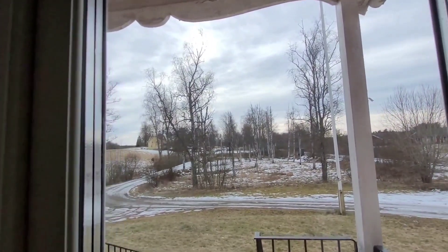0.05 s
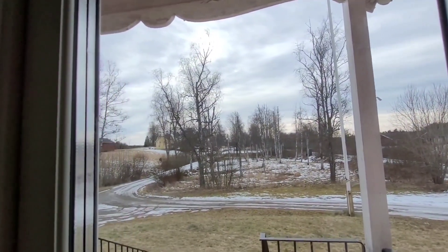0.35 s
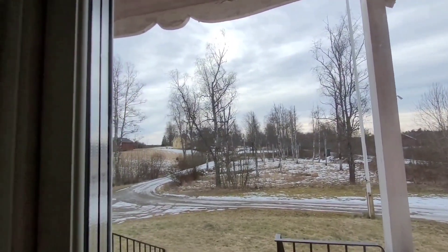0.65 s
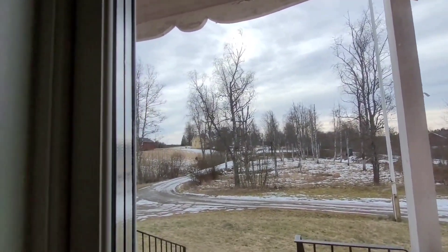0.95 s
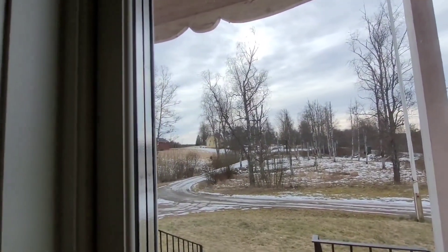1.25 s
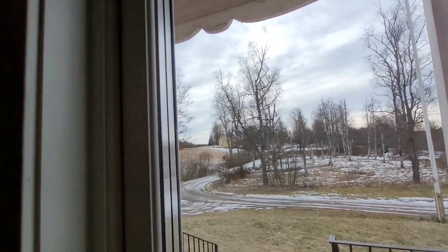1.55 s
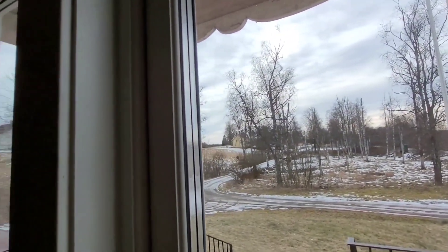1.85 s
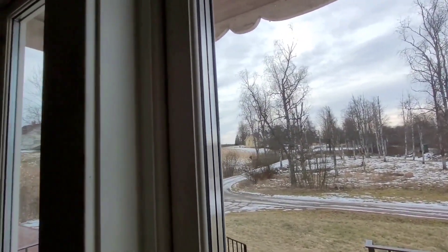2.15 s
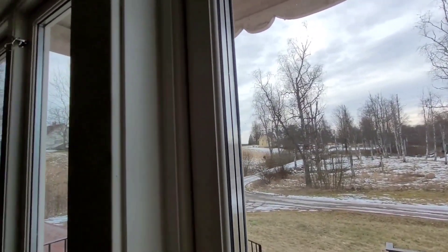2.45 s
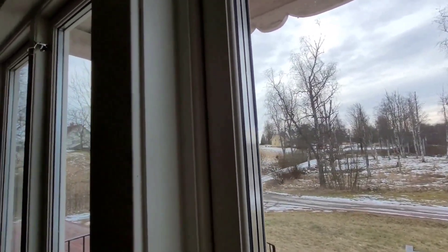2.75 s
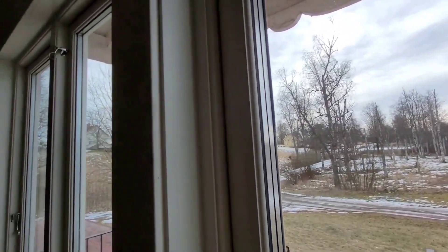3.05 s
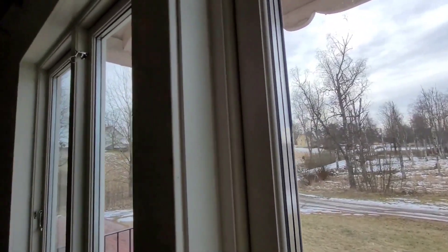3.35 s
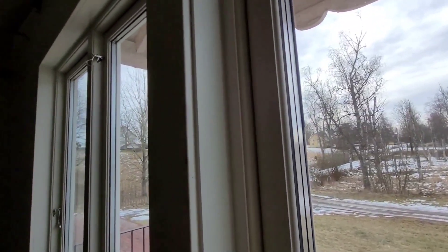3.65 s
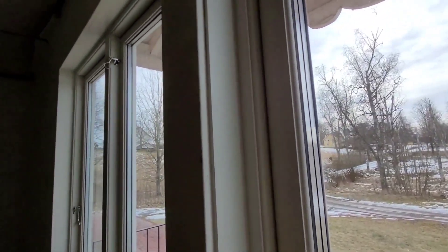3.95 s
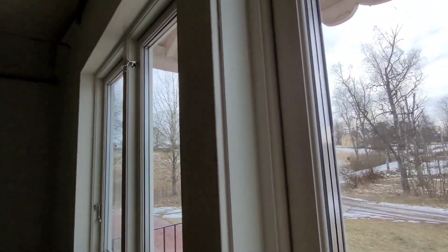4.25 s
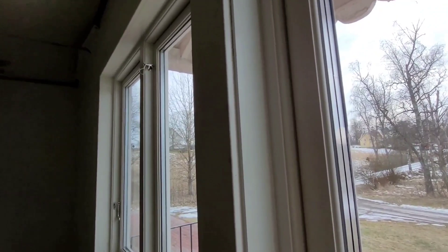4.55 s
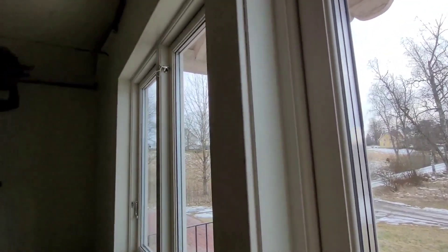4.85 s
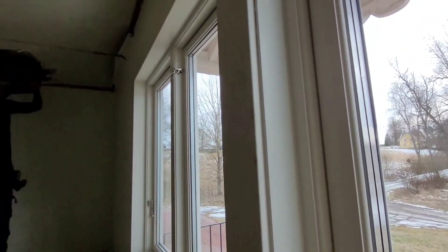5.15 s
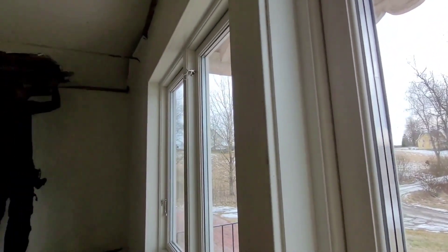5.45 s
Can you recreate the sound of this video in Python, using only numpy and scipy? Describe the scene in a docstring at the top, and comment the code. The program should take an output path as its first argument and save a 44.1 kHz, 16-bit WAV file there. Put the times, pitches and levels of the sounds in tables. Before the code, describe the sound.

Irregular wooden thuds and knocks sound as someone levers boards off a ceiling, with short creaks, squeaking nails and gritty scrapes between them. The loudest moment comes near the end, when thin wood splinters in several sharp cracks and a board falls. A drag, one more snap and small bumps follow. It is heard from a phone some distance away in an empty, reverberant room with almost no background noise.

```python
"""A hollow wooden thud opens the scene: ceiling boards are being pried down in a bare, echoing room.
Each blow flexes the board, knocks on wood, snaps splinters, booms in the joists and rebounds once.
Scraps are dragged over rubble in short strokes, levered nails squeak and boards creak, then laths
snap and one board crashes down. A phone across the room picks it up and hushes whatever is faint."""
import sys
import numpy as np
from scipy import signal
from scipy.fft import rfft, irfft, next_fast_len
from scipy.io import wavfile
from scipy.ndimage import uniform_filter1d

SR = 44100
rng = np.random.default_rng(int(sys.argv[2]) if len(sys.argv) > 2 else 0)


def inscribe(sig):
    """Save sig as 16-bit PCM at rate SR to the path in sys.argv[1].

    A 1-D sig is mono; a 2-D sig holds one channel per row.
    Samples are clipped to [-1, 1] before scaling.
    """
    pcm = np.round(np.clip(np.atleast_2d(sig).T, -1, 1) * 32767)
    wavfile.write(sys.argv[1], SR, pcm.astype(np.int16))


N = 246959
T, HZ = np.arange(SR) / SR, np.fft.rfftfreq(SR, 1 / SR)  # time and frequency axes of a one-second hit


def amp(db):
    """Decibels to gain."""
    return 10 ** (np.asarray(db) / 20)


def unit(x):
    """Scale to rms 1."""
    return x / np.sqrt(np.mean(x ** 2) + 1e-30)


def along(points, hz):
    """Read (frequency, value) points on a log frequency axis."""
    f, v = np.transpose(points)
    return np.interp(np.log(hz + 1), np.log(f + 1), v)


def causal(gain):
    """The minimum-phase response with this gain: nothing sounds before the hit."""
    cepstrum = irfft(np.log(np.maximum(gain, 1e-6)))
    half = len(cepstrum) // 2
    cepstrum[1:half] *= 2
    cepstrum[half + 1:] = 0
    return np.exp(rfft(cepstrum))


def resonances(modes):
    """Response of a body with these modes, falling steeply away from them."""
    return causal(sum(amp(db) / (1 + ((HZ ** 2 - centre ** 2) / (2 * width * (HZ + 1))) ** 2)
                      for centre, width, db in modes))


def softened(hz, edge_hz):
    """Low-pass: a soft contact holds little above its edge."""
    s = 1j * hz / edge_hz
    return 1 / (1 + np.sqrt(2) * s + s * s)


# Reverb of the bare room: (frequency [Hz], t60 [s])
ROOM_DECAY = [(60, 0.41), (150, 0.42), (300, 0.64), (700, 0.79), (1300, 0.81), (2000, 0.74), (4000, 0.48),
              (7000, 0.39), (10000, 0.33), (15000, 0.4)]
def room_response(direct, echoes_per_s, build_s):
    """The direct click, separate wall echoes, then a dense tail that lingers longest in the mids."""
    density = np.clip(echoes_per_s / SR * (1 + T / build_s) ** 2, 1e-4, 1)
    echoes = rng.standard_normal(SR) * (rng.random(SR) < density) / np.sqrt(density)
    hz, times, spectra = signal.stft(echoes, SR, nperseg=256, noverlap=128)
    decay = 1000. ** (-times / along(ROOM_DECAY, hz)[:, None])
    tail = signal.istft(spectra * decay, SR, nperseg=256)[1][:SR]
    tail /= np.linalg.norm(tail)
    tail[0] += direct
    return tail


# Tone of wood on wood: (frequency [Hz], level [dB])
KNOCK_EQ = [(70, -34.5), (250, -1.5), (430, 0), (560, -1), (670, 0.5), (750, -3), (950, -1), (1300, -2.5),
            (1700, -5.5), (2100, -9.5), (3000, -10), (4000, -28.5), (8000, -58), (14000, -84.5)]
def wood_knock(edge_hz):
    """Spectrum of a knock: the softer the contact, the duller it is."""
    return causal(amp(along(KNOCK_EQ, HZ))) * softened(HZ, edge_hz)


# Crunch of snapping fibres and grit: (frequency [Hz], level [dB])
SPLINTER_EQ = [(200, -37.5), (600, -8), (1300, -0.5), (2100, -8), (2900, -5), (3700, -0.5), (4900, -7.5),
               (6200, -6), (8200, -12), (9000, -19.5), (12000, -20), (15500, -25.5)]
def splinters(low_cut_hz):
    """Spectrum of chips and grit, too small to radiate low notes."""
    low_cut = (softened(HZ, low_cut_hz) * (HZ / low_cut_hz) ** 2) ** 2
    return causal(amp(along(SPLINTER_EQ, HZ))) * low_cut


# Ringing modes of the timber: (pitch [Hz], level [dB], t60 [s])
TIMBER_MODES = [(373, -10, 0.06), (476, 2.5, 0.66), (562.5, -0.5, 0.56), (651, -3.5, 0.55), (802, -7, 0.54),
                (843, -1, 0.38), (990, -9, 0.62), (1307, 0, 0.42), (1406, -8.5, 0.4), (1623, -11.5, 0.77)]
def timber_ring(edge_hz, spread_db):
    """Each spot struck rings the timber's modes in a new balance."""
    hz, db, t60 = np.transpose(TIMBER_MODES)
    modes = np.exp(np.outer(2j * np.pi * hz - np.log(1000) / t60, T))
    strengths = amp(db + spread_db * rng.standard_normal(len(hz))) * softened(hz, edge_hz)
    phases = np.exp(2j * np.pi * rng.random(len(hz)))
    return (strengths * phases @ modes).real * np.tanh(T / 0.0026) ** 2


# Body of the thud, the boards' bending modes: (pitch [Hz], width [Hz], level [dB])
BOARD_MODES = [(151.2, 24, 3.5), (214.2, 14, 1.5), (278.5, 33, -2.5), (368.5, 88, -7)]
# Low boom of the joists and the lowest room modes: (pitch [Hz], width [Hz], level [dB])
JOIST_MODES = [(54.3, 27, -2.5), (79, 25, 3)]
# Cues for blows, cracks and landings: (time [s], joist boom [dB], board flex [dB], knock [dB],
# knock edge [Hz], splinter [dB], splinter edge [Hz], attack [s])
BLOW_CUES = [(0.0, -29, -22.5, -43, 560, -54, 6200, 0.00046),
             (.11, -46.5, -28.5, -49, 1406, -72.5, 4500, 0.027),
             (.272, -40, -36.5, -38, 793, -39, 13100, 0.017),
             (.335, -34, -35.5, -33.5, 475, -47, 8000, 0.02),
             (.529, -46, -24.5, -32.5, 1038, -50, 6100, 0.0017),
             (.552, -41, -40, -30, 746, -51, 3620, 0.0012),
             (.63, -38.5, -35, -39.5, 890, -53.5, 5440, .004),
             (0.702, -43, -35, -43, 935, -64, 5130, 0.0015), (.995, -51, -49, -52, 690, -72, 4220, .04),
             (1.511, -49.5, -44.5, -52, 800, -53, 10730, 0.016),
             (1.606, -34.5, -29.5, -56, 1620, -57.5, 10680, 0.0013),
             (1.633, -30, -36.5, -42.5, 1313, -51.5, 9140, 0.0018),
             (2.158, -23.5, -21.5, -31.5, 850, -83, 8070, .006),
             (2.176, -36.5, -27, -20, 443, -61, 4400, 0.0015),
             (2.224, -31.5, -23, -39, 750, -66, 3980, 0.0044),
             (2.295, -32, -26, -42, 1900, -55.5, 4100, 0.025),
             (2.538, -56, -59, -38.5, 1010, -56, 3700, 0.011),
             (2.623, -44, -31, -36, 1530, -51.5, 5900, 0.0025),
             (2.655, -35, -38, -35.5, 600, -44.5, 6630, 0.015),
             (3.163, -41.5, -36.5, -83, 436, -71.5, 10170, 0.035),
             (3.2, -34, -35, -53.5, 441, -58, 8500, 0.011),
             (3.444, -56, -49, -49.5, 587, -60.5, 16300, 0.027),
             (3.558, -46.5, -40, -44.5, 906, -41.5, 16100, .008),
             (3.634, -48, -39.5, -67.5, 886, -69.5, 9450, 0.0028),
             (3.74, -47.5, -40.5, -76.5, 993, -58.5, 9960, 0.0011),
             (3.848, -48, -49.5, -91, 1058, -74, 11520, 0.033),
             (3.981, -50.5, -47, -53, 860, -55, 7770, 0.049),
             (4.091, -34.5, -37.5, -54.5, 612, -62, 5350, 0.0064),
             (4.128, -50.5, -31, -28.5, 1416, -31, 6280, 0.003),
             (4.15, -43.5, -26, -24.5, 1466, -24.5, 16160, 0.00088),
             (4.172, -34.5, -42, -21.5, 2690, -26.5, 10560, 0.00049),
             (4.2, -37, -31, -21.5, 2090, -21, 15000, 0.0012),
             (4.226, -45.5, -26, -21.5, 395, -21.5, 4016, 0.00088),
             (4.255, -37.5, -32.5, -20, 1130, -42.5, 11070, .001),
             (4.32, -38.5, -25.5, -26, 2510, -33, 3760, 0.0122),
             (4.615, -40.5, -38.5, -52.5, 1100, -60.5, 6860, 0.021),
             (4.989, -62, -50.5, -27.5, 2590, -40, 13600, 0.0095),
             (5.016, -47.5, -35.5, -37, 2310, -31, 15430, 0.00087),
             (5.214, -42, -41, -47.5, 1040, -43.5, 16150, 0.0045),
             (5.3, -43.5, -41.5, -47.5, 1100, -56.5, 15700, 0.01),
             (5.366, -67, -47.5, -43, 1800, -47.5, 12860, 0.00097),
             (5.52, -43.5, -37.5, -49.5, 1310, -56.5, 15800, 0.0076)]
def blows(ring_db, chip_hz, chip_db, chip_growth, joist_lag_s, rebound_s, rebound_db, soft_db):
    """A struck board booms, flexes, knocks, splinters and rings, then springs back once, more softly."""
    out = np.zeros(N + 2 * SR)
    board = resonances(BOARD_MODES)
    joists = resonances(JOIST_MODES) * np.exp(-2j * np.pi * HZ * joist_lag_s)  # heavy, so they lag
    for start_s, boom_db, flex_db, knock_db, knock_hz, splinter_db, splinter_hz, attack_s in BLOW_CUES:
        # faint splintering frees only small chips, so it sounds thinner
        chips = splinters(low_cut_hz=chip_hz * amp(chip_growth * (chip_db - splinter_db)))
        # the finest fractures set a steep upper edge
        high_cut = causal(1 / np.sqrt(1 + (HZ / splinter_hz) ** 8))
        bodies = np.array([joists, board, wood_knock(knock_hz), chips * high_cut])
        strike = amp([boom_db, flex_db, knock_db, splinter_db, knock_db + ring_db])
        rebound = strike * amp(rebound_db) * amp([0, 0, soft_db, soft_db, soft_db])
        for at_s, levels in [(start_s, strike), (start_s + rebound_s, rebound)]:
            room = room_response(direct=0.6, echoes_per_s=1000, build_s=0.012)  # new spot, new echoes
            layers = np.vstack([irfft(rfft(room) * bodies, SR), timber_ring(knock_hz, spread_db=7)])
            layers *= np.tanh(T / attack_s)  # a board that gives way slowly swells in
            # each layer's level is its rms over the first tenth of a second
            layers /= np.sqrt(np.mean(layers[:, :SR // 10] ** 2, axis=1, keepdims=True))
            out[round(at_s * SR):][:SR] += levels @ layers
    return out[:N]


def room_tone(db):
    """The faint hiss of the quiet house, a bed under everything."""
    return amp(db) * unit(signal.lfilter([1], [1, -0.6], rng.standard_normal(N)))


# Cues for boards dragged over rubble: (start [s], length [s], grit [dB], wood rub [dB])
DRAG_CUES = [(0.283, 0.039, -44, -61), (0.873, .14, -61, -53.5), (1.161, .14, -69, -53.5),
             (1.484, .04, -49, -50.5), (2.298, 0.068, -59.5, -55.5), (2.736, 0.043, -73, -38),
             (3.189, .06, -47.5, -83), (3.327, .08, -56.5, -73), (3.408, 0.12, -44.5, -47.5),
             (3.521, 0.02, -33, -64), (3.746, 0.04, -48, -69.5), (3.976, 0.045, -57, -73.5),
             (4.395, 0.31, -57, -45.5), (4.965, 0.1, -32.5, -34.5), (5.195, 0.028, -34, -53),
             (5.362, .12, -44.5, -48.5)]
def drag_envelopes(grip_s, release_db_per_s):
    """Faders for grit and rub: each stroke takes hold, slides evenly and runs out."""
    t, out = np.arange(N) / SR, np.zeros((2, N))
    for start_s, length_s, grit_db, rub_db in DRAG_CUES:
        attack = np.clip((t - start_s) / grip_s, 0, 1)
        release = amp(-release_db_per_s * np.clip(t - start_s - length_s, 0, 1))
        out += np.outer(amp([grit_db, rub_db]), attack * release)
    return out


# Rasp of light grit: (pitch [Hz], width [Hz], level [dB])
RASP_MODES = [(3780, 610, -1.5), (5700, 370, -6)]
# Hollow rub of a dragged board: (pitch [Hz], width [Hz], level [dB])
RUB_MODES = [(680, 69, -4), (1160, 400, 2)]
def scrape(slips_per_s, spread_db, pressed_db):
    """A dragged board catches and slips: over a hollow rub, grit rasps, or crunches when pressed hard."""
    grit, rub = drag_envelopes(grip_s=0.022, release_db_per_s=352.5)
    pressed = grit / (grit + amp(pressed_db))
    layers = [(grit * pressed, splinters(low_cut_hz=2400)),
              (grit * (1 - pressed), resonances(RASP_MODES)),
              (rub, resonances(RUB_MODES))]
    out = np.zeros(N)
    for envelope, body in layers:
        slips = (rng.random(N) < slips_per_s / SR) * amp(spread_db * rng.uniform(-0.95, 1, N))
        room = room_response(direct=0.2, echoes_per_s=910, build_s=0.035)
        tick = irfft(rfft(room) * body, SR)
        out += signal.fftconvolve(unit(slips) * envelope, tick / np.linalg.norm(tick))[:N]
    return out


# Cues for levered nails and boards that squeak, creak or shudder:
# (peak time [s], fade each side [s], pitch [Hz], level [dB])
CREAK_CUES = [(.405, 0.038, 143.6, -21.5), (.482, .025, 149.3, -26.5), (0.568, .05, 703.6, -27.5),
              (0.606, 0.028, 2803, -45.5), (.662, 0.019, 3790, -54), (1.033, 0.0183, 168, -37.5),
              (1.55, 0.063, 191.7, -38), (1.612, 0.025, 3800, -47), (1.638, .02, 1252, -42),
              (2.189, .042, 1700, -39.5), (2.25, 0.069, 660, -26), (2.575, 0.048, 869, -38),
              (2.66, 0.036, 337.4, -28), (3.185, .035, 292, -35.5), (3.635, .065, 159.5, -33.5),
              (4.16, 0.033, 219, -12.5), (4.166, 0.012, 325, -9.5), (4.642, 0.0355, 149.5, -24.5),
              (4.745, 0.03055, 142, -34.5), (5.215, 0.04, 160.5, -36.5), (5.318, 0.059, 56.3, -35.5),
              (5.534, 0.039, 321.8, -35.5)]
def creaks(waver, reverb_db):
    """Stick and slip drive one unsteady resonance for a moment; the room holds it a little longer."""
    out = np.zeros(N + 2 * SR)
    for peak_s, fade_s, pitch_hz, db in CREAK_CUES:
        size = int(2 * fade_s * SR)
        knots = rng.standard_normal(8 + int(fade_s * pitch_hz / 4))
        drift = unit(np.interp(np.arange(size), np.linspace(0, size, len(knots)), knots))
        tone = np.hanning(size) * np.sin(2 * np.pi * np.cumsum(pitch_hz * (1 + waver * drift)) / SR)
        reverb = signal.fftconvolve(tone, room_response(direct=0, echoes_per_s=530, build_s=0.0057))
        creak = amp(reverb_db) * reverb * np.linalg.norm(tone) / np.linalg.norm(reverb)
        creak[:size] += tone
        out[round((peak_s - fade_s) * SR):][:len(creak)] += amp(db) * np.sqrt(2) * creak
    return out[:N]


# Cues for laths snapping and nails ticking free: (time [s], pitch [Hz], peak level [dB])
SNAP_CUES = [(3.411, 3740, -37), (3.573, 6750, -27), (4.13, 3545, -6.5), (4.148, 3804, -12),
             (4.199, 3330, -6), (4.227, 3197, -7), (4.254, 2730, -6.5), (4.957, 3700, -41),
             (4.987, 3500, -25), (5.016, 3890, -19), (5.367, 3300, -39)]
def snaps(width_share, t60_s):
    """A fast-dying run of tiny fractures sounds one broad resonance of the piece."""
    out = np.zeros(N + SR)
    for start_s, pitch_hz, db in SNAP_CUES:
        fractures = rng.standard_normal(SR) * 1000. ** (-T / t60_s)
        body = resonances([(pitch_hz, width_share * pitch_hz, 0)])
        snap = irfft(rfft(fractures) * body, SR)
        out[round(start_s * SR):][:SR] += amp(db) * snap / np.abs(snap).max()
    return out[:N]


def scene():
    """The mono mix of the work and its room."""
    mix = blows(ring_db=-7.5, chip_hz=2576, chip_db=-59.5, chip_growth=0.21,
                joist_lag_s=0.015, rebound_s=0.06, rebound_db=-12, soft_db=-5)
    mix += room_tone(db=-68)
    mix += scrape(slips_per_s=440, spread_db=8, pressed_db=-52)
    mix += creaks(waver=0.037, reverb_db=-5)
    mix += snaps(width_share=0.19, t60_s=0.078)
    return mix[None]


# Threshold under which the phone hushes a band: (frequency [Hz], power density [dB])
HUSH_THRESHOLD = [(60, -75.5), (250, -74.5), (700, -75), (1300, -83), (2100, -87.5), (3600, -104),
                  (6000, -104), (12000, -113)]
def noise_suppressor(x, gate_db, floor_db):
    """Faint bands are turned down, and all of them once the whole sound grows faint."""
    framing = dict(nperseg=1024, noverlap=768, scaling="psd")
    hz, _, spectra = signal.stft(x, SR, **framing)
    power = 2 * np.abs(spectra) ** 2
    smoothed = np.abs(uniform_filter1d(uniform_filter1d(power, size=5, axis=1), size=3, axis=2))
    band_gain = smoothed / (smoothed + amp(along(HUSH_THRESHOLD, hz))[:, None] ** 2)
    total = power.sum(axis=1, keepdims=True) * hz[1]
    gate = np.sqrt(total / (total + amp(gate_db) ** 2))
    gain = np.maximum(band_gain * gate, amp(floor_db))
    return signal.istft(spectra * gain, SR, **framing)[1][:, :N]


def record(dry):
    """The phone hushes the background, rounds off the highest peaks and cuts the very top."""
    ceiling, top_hz = 0.92, 15930
    hushed = noise_suppressor(dry, gate_db=-45.5, floor_db=-21.5)
    rounded = hushed / (1 + np.abs(hushed / ceiling) ** 6) ** (1 / 6)
    size = next_fast_len(N + SR)
    passband = np.fft.rfftfreq(size, 1 / SR) < top_hz
    return irfft(rfft(rounded, size) * passband, size)[:, :N]


dry = scene()
out = record(dry)
inscribe(out)
```